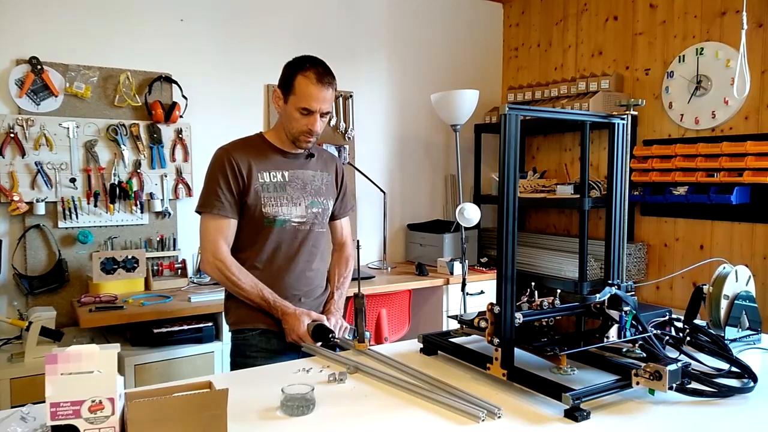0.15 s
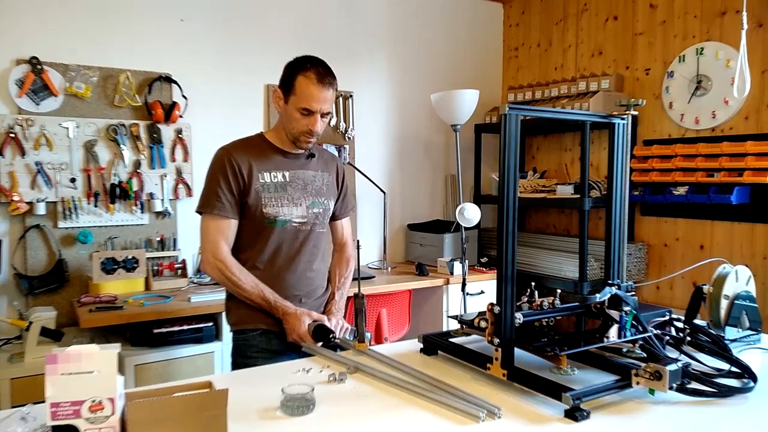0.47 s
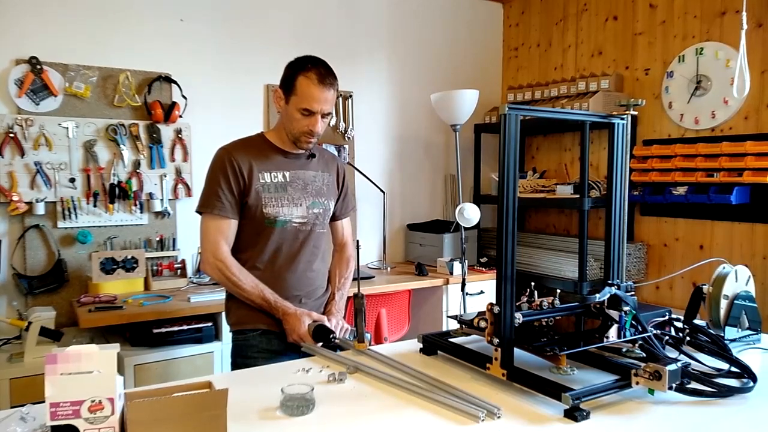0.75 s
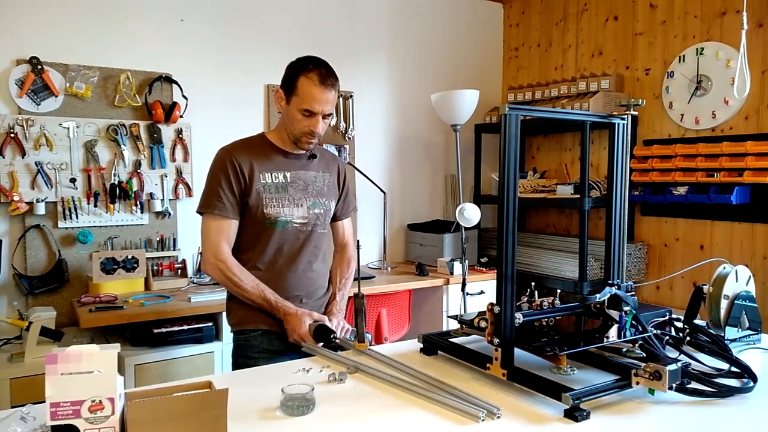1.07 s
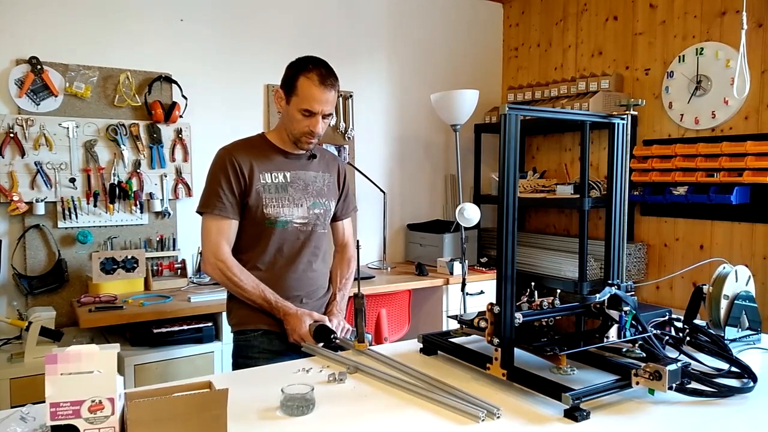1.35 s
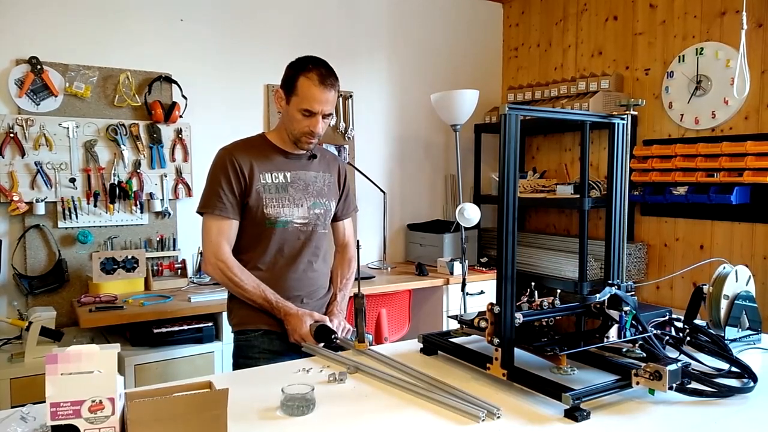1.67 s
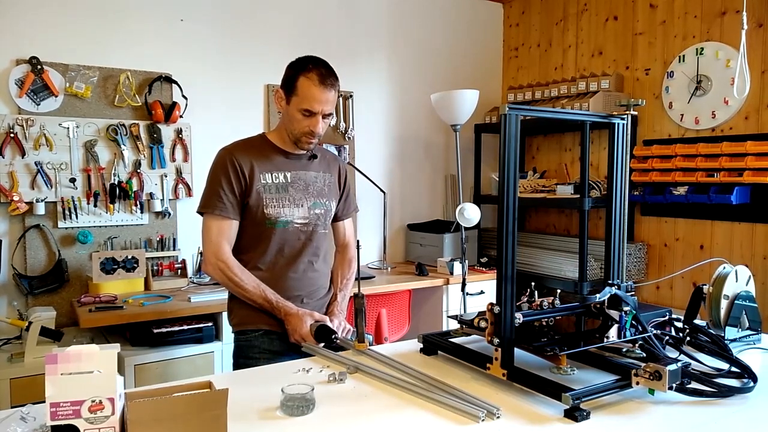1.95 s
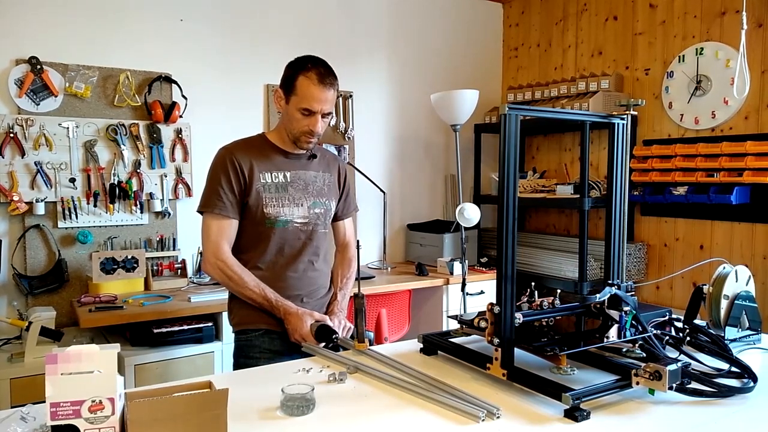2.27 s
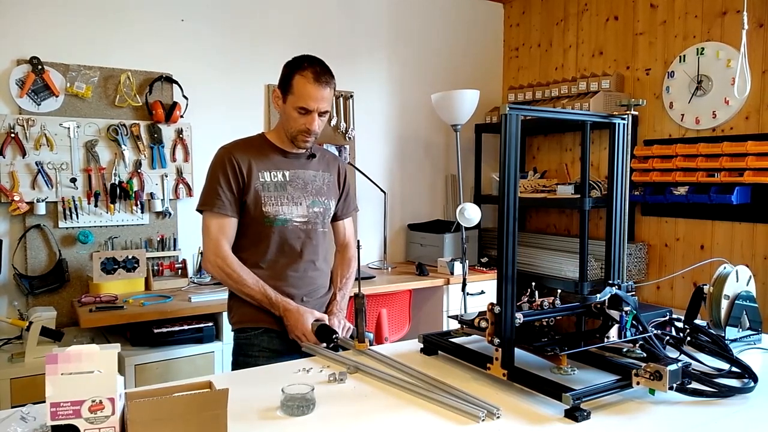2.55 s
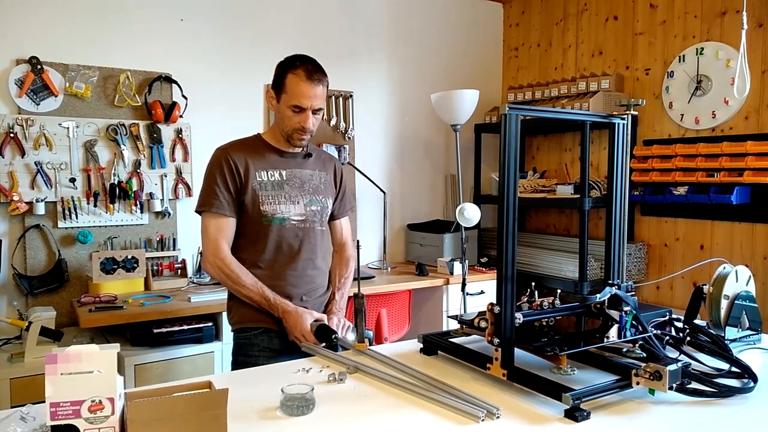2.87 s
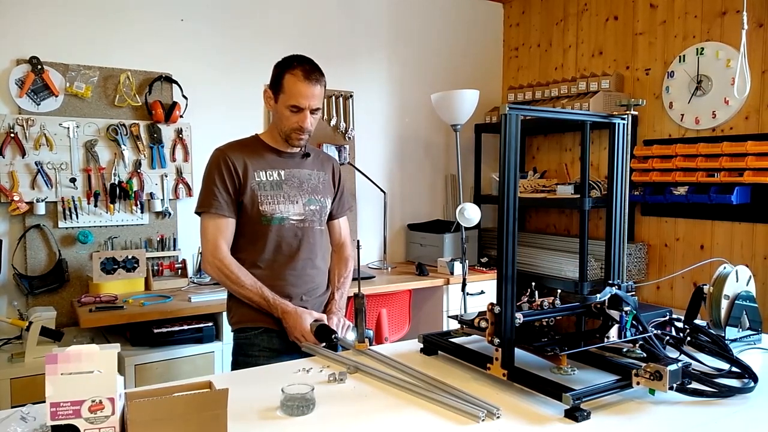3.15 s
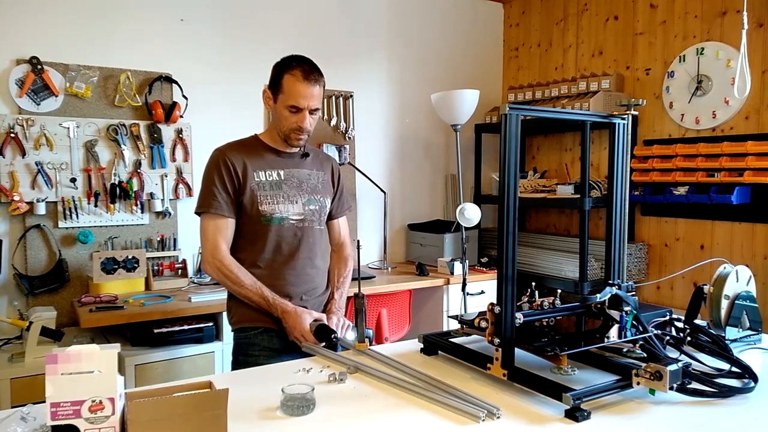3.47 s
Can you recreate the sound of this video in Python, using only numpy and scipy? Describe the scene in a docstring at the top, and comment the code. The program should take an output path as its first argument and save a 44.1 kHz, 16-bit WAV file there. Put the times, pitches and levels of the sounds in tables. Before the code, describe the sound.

Cordless drill driving a tap into aluminium labours and stops; switch snaps, and it backs out faster.

```python
"""Small workshop: a cordless drill drives a tap into an aluminium profile, slowing as the thread bites.
It stops, the direction switch snaps over, and it backs the tap out, first slowly, then at speed.
Gear tones follow the tooth mesh rate; rattle and bright rasp are grain noise pulsed by each tooth.
Under load all three throb with each turn of a gear wheel. The tap squeals and judders, chips ring,
gears clack; a shifting diffuse room and low-heavy noise lie behind."""
import sys
import numpy as np
from scipy import signal
from scipy.fft import rfft, irfft
from scipy.io import wavfile

SR = 44100
rng = np.random.default_rng(int(sys.argv[2]) if len(sys.argv) > 2 else 0)


def store_wav(level_fs):
    """Save 16-bit WAV to argv[1]."""
    pcm = np.round(np.clip(np.atleast_2d(level_fs), -1, 1) * 32767)
    wavfile.write(sys.argv[1], SR, pcm.T.astype(np.int16))


N = 158760
T = np.arange(N) / SR
HZ = np.fft.rfftfreq(N, 1 / SR)
FLUTTER_HZ = 34.85  # bandwidth of level flutter and pitch wander

# low resonances: (frequency [Hz], width [Hz], level over the broad sound [dB])
LOW_MODES = [(223, 19, 8), (268, 7.1, 6.5), (369, 44, 7)]
WHEEL_TEETH, FIRST_THROB_S, RATTLE_THROB_SHARE = 16, 0.0094, 0.44
TOOTH_DEPTH = 0.3
RATTLE_GRIT_DB, RASP_GRIT_DB, GRAINS_PER_S = 2.5, 0.5, 5000


def drill(speed, levels, tones, body, rattle_colour, rasp_colour, throb_db, flutter_db):
    """One run: rough mesh-rate harmonics plus tooth-pulsed rattle and rasp, throbbing per wheel turn."""
    mesh_hz, = at_time(speed)
    tone_db, rattle_db, rasp_db = at_time(levels)
    angle = 2 * np.pi * np.cumsum(mesh_hz) / SR
    first_angle = np.interp(FIRST_THROB_S, T, angle)
    throb = throb_db * np.cos((angle - first_angle) / WHEEL_TEETH)
    teeth = unit(1 + TOOTH_DEPTH * np.cos(angle))

    whine = np.zeros(N)
    for multiple, db, rough, width_hz in tones:
        rough = np.clip(rough, 0, 1)
        waver = np.sqrt(1 - rough) + np.sqrt(rough) * flutter(width_hz)
        gain = np.sqrt(2) * amp(db + at_hz(body, multiple * mesh_hz))
        whine += gain * (waver * np.exp(1j * multiple * angle)).real
    # gear tones throb with the wheel, plus any random level flutter
    whine *= amp(tone_db + throb + flutter_db * flutter(FLUTTER_HZ).real)

    rattle = grains(RATTLE_GRIT_DB) * teeth * amp(rattle_db + RATTLE_THROB_SHARE * throb)
    rattle = colour(rattle, rattle_colour, LOW_MODES)
    rasp = colour(grains(RASP_GRIT_DB) * teeth * amp(rasp_db + throb), rasp_colour)
    running = (T >= levels[0][0]) & (T <= levels[-1][0])
    return running * (whine + rattle + rasp)


# motor speed: (time [s], tooth mesh rate [Hz])
CUT_SPEED = [(0, 511.4), (.2, 471.3), (.45, 428.9), (.7, 397.7), (1.05, 378), (1.42, 360.6), (1.7, 375.6),
             (1.9, 361.2), (2.11, 367.7), (2.27, 119.7)]
# layer gains: (time [s], gear tones [dB], rattle [dB], rasp [dB])
CUT_LEVEL = [(0, -26.5, -28.5, -27.5), (.35, -26, -29.5, -28.5), (.75, -26.5, -27.5, -29),
             (2.106, -33.5, -26.5, -28.5), (2.119, -47, -28, -68), (2.2, -76, -45.5, -84),
             (2.3, -88, -67, -68)]
# gear tones and motor whine: (multiple of mesh rate, relative level [dB], roughness [0-1], width [Hz])
CUT_TONES = [(1, -5.5, 0.74, 46), (2, -9, 0.8, 123), (3, -0.5, 0.79, 167), (6.55, -13, .8, 90)]
# drill radiation of the tones: (frequency [Hz], gain [dB])
CUT_BODY = [(330, -15), (390, -3), (690, 3), (950, -14.5), (1120, 0.5), (1320, -6.5), (2400, -10),
            (2850, -1.5)]
# backlash rattle spectrum: (frequency [Hz], relative density [dB per Hz])
CUT_RATTLE = [(95, -58), (190, -17), (385, -2.5), (470, -7), (640, 2), (820, 0.5), (1400, 0), (3000, -13),
              (5000, -40.5)]
# brush rasp spectrum: (frequency [Hz], relative density [dB per Hz])
CUT_RASP = [(100, -51), (1000, -27.5), (2300, -5.5), (3300, -6), (4000, -0.5), (6700, -0.5), (7700, 2.5),
            (9900, -10), (12600, -14.5), (13400, -38)]


def cutting():
    """Cutting run: the mesh rate sags as the thread loads the motor, with a wheel throb."""
    return drill(CUT_SPEED, CUT_LEVEL, CUT_TONES, CUT_BODY, CUT_RATTLE, CUT_RASP,
                 throb_db=1.5, flutter_db=0)


# motor speed: (time [s], tooth mesh rate [Hz])
BACK_SPEED = [(2.665, 169.3), (2.70, 268.8), (2.78, 265.3), (2.87, 335.1), (2.95, 363.5), (3.025, 346.8),
              (3.055, 484.7), (3.12, 592.6), (3.18, 621.8), (3.6, 665.5)]
# layer gains: (time [s], gear tones [dB], rattle [dB], rasp [dB])
BACK_LEVEL = [(2.659, -86, -53, -52), (2.689, -35.5, -33, -36.5), (2.78, -32.5, -35.5, -37.5),
              (3.02, -29, -36.5, -31.5), (3.07, -30, -33, -29), (3.14, -33.5, -31, -26.5),
              (3.6, -38.5, -31, -26)]
# gear tones and motor whine: (multiple of mesh rate, relative level [dB], roughness [0-1], width [Hz])
BACK_TONES = [(1, 1.5, 0.1, 28), (2, -8, 0.26, 24), (3, -2, 0.69, 136), (6.27, 0, 0.7, 99)]
# drill radiation of the tones: (frequency [Hz], gain [dB])
BACK_BODY = [(230, -12), (290, -17), (370, -20), (480, -9), (640, 1), (1080, -1), (1300, -14), (3400, -19),
             (3850, -1)]
# backlash rattle spectrum: (frequency [Hz], relative density [dB per Hz])
BACK_RATTLE = [(115, -49), (190, -4.5), (380, -9.5), (530, 6), (1500, 2), (2700, -4), (5000, -42)]
# brush rasp spectrum: (frequency [Hz], relative density [dB per Hz])
BACK_RASP = [(100, -70), (1000, -11), (2300, -14.5), (4200, 0), (6700, -0.5), (7900, 5), (10600, -15.5),
             (12400, -15.5), (13400, -25), (16000, -40)]


def backing_out():
    """Reverse run: the mesh rate climbs, with hardly any throb and a slight random level flutter."""
    return drill(BACK_SPEED, BACK_LEVEL, BACK_TONES, BACK_BODY, BACK_RATTLE, BACK_RASP,
                 throb_db=0.1, flutter_db=0.5)


SQUEAL_HZ, SQUEAL_DB, SQUEAL_SPAN_S = (873, 797), -32.5, (0.0185, 0.66)


def tap_squeal():
    """Tap entering the hole: a fluttering squeal that sinks in pitch."""
    swell = np.sin(np.pi * np.interp(T, SQUEAL_SPAN_S, [0, 1]))
    angle = 2 * np.pi * np.cumsum(np.interp(T, SQUEAL_SPAN_S, SQUEAL_HZ)) / SR
    return amp(SQUEAL_DB) * swell * ((1 + flutter(2 * FLUTTER_HZ)) * np.exp(1j * angle)).real


# tap catching in the thread: (time [s], level [dB])
CATCHES = [(0.719, -23.5), (1.005, -17.5), (1.399, -16), (1.67, -16), (1.736, -19.5), (1.927, -19),
           (2.0, -19)]
JUDDER_HZ, JUDDER_WANDER_HZ, JUDDER_RISE_S = 1110, 24.995, 0.0037


def tap_judder():
    """Tap catching in the thread: short bursts of one tone with straying pitch."""
    bursts = np.zeros(N)
    for s, db in CATCHES:
        age = np.maximum(T - s, 0) / JUDDER_RISE_S
        bursts += amp(db) * age * np.exp(1 - age)
    return bursts * wavering(JUDDER_HZ, JUDDER_WANDER_HZ)


# profile resonances: (frequency [Hz], width [Hz], relative level [dB])
PROFILE_MODES = [(4140, 57, 1), (4966, 78, 0.5), (6150, 110, -6), (7300, 70, 0.5)]
CHIPS_DB, CHIPS_PER_S, PROFILE_WANDER_HZ = -42, 120, 95.1


def chips():
    """Chips breaking off ring the profile: random decays on carriers of straying pitch."""
    cut_end_s = CUT_SPEED[-2][0]
    out = np.zeros(N)
    for hz, width_hz, db in PROFILE_MODES:
        breaks = rng.uniform(-1, 1, N) * (rng.random(N) < CHIPS_PER_S / SR) * (T < cut_end_s)
        decay = np.exp(-np.pi * width_hz / SR)
        ring = signal.lfilter([1], [1, -decay], breaks + 1e-18)
        out += amp(CHIPS_DB + db) * unit(ring * wavering(hz, PROFILE_WANDER_HZ))
    return out


# direction switch contacts: (time [s], crack level [dB], ring level [dB])
SWITCH = [(2.4093, -21, -23), (2.412, -18, -40), (2.4132, -21, -11.5)]
# crack spectrum: (frequency [Hz], relative density [dB per Hz])
SWITCH_COLOUR = [(100, -19), (650, 4.5), (2300, -5), (8500, -1), (11500, -21), (16000, -30)]
SWITCH_RING_HZ, SWITCH_RING_S, SWITCH_FADE_S = 7450, .0008, .0015


def switch():
    """Direction switch: three quick plastic contacts as noise cracks; the last rings brightly."""
    crack, ring = np.zeros(N), np.zeros(N)
    for s, crack_db, ring_db in SWITCH:
        crack += amp(crack_db) * dying(s, SWITCH_FADE_S)
        ring += amp(ring_db) * dying(s, SWITCH_RING_S) * np.sin(2 * np.pi * SWITCH_RING_HZ * (T - s))
    return colour(crack * rng.standard_normal(N), SWITCH_COLOUR) + ring


# trigger ticks and gears taking up slack: (time [s], level [dB])
CLACKS = [(2.227, -38), (2.632, -44), (2.646, -39), (2.6793, -16.5), (2.7039, -16.5)]
# clack spectrum: (frequency [Hz], relative density [dB per Hz])
CLACK_COLOUR = [(150, -29), (700, 2), (2000, -5.5), (7500, 2), (16000, -36)]
CLACK_FADE_S = 0.0033


def clacks():
    """Trigger and gearbox: short noise cracks as the drill stops and starts."""
    envelope = sum(amp(db) * dying(s, CLACK_FADE_S) for s, db in CLACKS)
    return colour(envelope * rng.standard_normal(N), CLACK_COLOUR)


HUM_HZ, HUM_DB, HUM_FADE_S = 216, -34, 0.072


def housing():
    """Housing hum: a decaying low tone set off by the last clack."""
    start_s = CLACKS[-1][0]
    return amp(HUM_DB) * dying(start_s, HUM_FADE_S) * np.sin(2 * np.pi * HUM_HZ * (T - start_s))


KNOCK_S, KNOCK_DB, KNOCK_HZ, KNOCK_FADE_S = 2.6685, -29, 846, 0.0048


def rotor_knock():
    """Rotor breaking loose: a dull decaying knock."""
    return amp(KNOCK_DB) * dying(KNOCK_S, KNOCK_FADE_S) * np.sin(2 * np.pi * KNOCK_HZ * (T - KNOCK_S))


PWM_HZ, PWM_SPAN_S, PWM_DB = 3880, (2.651, 2.68), (-48, -51)  # levels: switching rate, octave


def windings():
    """Stalled windings: a brief swell at the switching rate and its octave."""
    swell = np.sin(np.pi * np.interp(T, PWM_SPAN_S, [0, 1]))
    return swell * sum(amp(db) * np.sin(2 * np.pi * (k + 1) * PWM_HZ * T) for k, db in enumerate(PWM_DB))


ROOM_DB, SWAY_HZ = -7, 5


def room(x, count=3):
    """Workshop reverb: echo patterns crossfade as the drill moves; already ringing at the start."""
    x = np.pad(x, (SR, 0), mode="reflect")
    turn = np.pi * SWAY_HZ * np.arange(len(x)) / SR
    wet = sum(signal.fftconvolve(x * np.cos(turn + np.pi * k / count), echoes()) for k in range(count))
    return amp(ROOM_DB) * np.sqrt(2 / count) * wet[SR:SR + N]


# reverberation: (frequency [Hz], 60 dB decay time [s])
ROOM_T60 = [(200, 0.51), (700, 0.36), (6000, 0.42)]
ROOM_GAP_S = 0.0016


def echoes():
    """One diffuse echo pattern: noise decaying at a rate set per frequency, after a short gap."""
    hz, s, z = signal.stft(rng.standard_normal(SR), SR, nperseg=256)
    decay = amp(-60 * s / at_hz(ROOM_T60, hz)[:, None])
    tail = signal.istft(z * decay, SR, nperseg=256)[1][:SR]
    tail = tail * (T[:SR] > ROOM_GAP_S)
    return tail / np.linalg.norm(tail)


# background spectrum: (frequency [Hz], relative density [dB per Hz])
FLOOR = [(25, -27), (200, 18), (9000, 0), (16000, -33)]
FLOOR_DB = -64.5


def background():
    """Steady noise, strongest in the low range."""
    return amp(FLOOR_DB) * colour(rng.standard_normal(N), FLOOR)


def amp(db):
    """Decibels to gain."""
    return 10 ** (np.asarray(db) / 20)


def unit(x):
    """Scales to rms 1."""
    return x / np.sqrt(np.mean(abs(x) ** 2) + 1e-20)


def at_hz(points, hz):
    """Reads a table on a log-frequency axis."""
    f, value = np.transpose(points)
    return np.interp(np.log(hz + 1), np.log(f), value)


def at_time(rows):
    """Every column of a control table, sample by sample."""
    s, *columns = np.transpose(rows)
    return [np.interp(T, s, c) for c in columns]


def colour(x, points, modes=()):
    """Causal minimum-phase filter of unit power: a broad spectrum with resonances on top."""
    power = 1 + sum(amp(db) ** 2 / (1 + (2 * (HZ - f) / width) ** 2) for f, width, db in modes)
    log_gain = np.log(unit(amp(at_hz(points, HZ)) * np.sqrt(power)))
    # fold the cepstrum onto positive time
    cepstrum = irfft(log_gain, N) * np.sign(N / 2 - np.arange(N))
    cepstrum[1:N // 2] *= 2
    cepstrum[N // 2:] = 0
    return irfft(rfft(x) * np.exp(rfft(cepstrum)), N)


def flutter(width_hz):
    """Complex noise that changes about width_hz times a second."""
    z = rng.standard_normal(N) + 1j * rng.standard_normal(N)
    lowpass = 1 + (np.fft.fftfreq(N, 1 / SR) / width_hz) ** 4
    return unit(np.fft.ifft(z / lowpass))


def wavering(hz, wander_hz):
    """A tone whose pitch strays quickly around hz, by wander_hz rms."""
    return np.cos(2 * np.pi * np.cumsum(hz + wander_hz * unit(flutter(FLUTTER_HZ).real)) / SR)


def grains(grit_db):
    """A dense spray of tiny impacts of uneven size."""
    size = amp(grit_db * np.minimum(rng.exponential(1, N), 5))
    return unit(size * rng.choice([-1, 1], N) * (rng.random(N) < GRAINS_PER_S / SR))


def dying(start_s, fade_s):
    """An envelope that jumps up at start_s and dies away."""
    return (T >= start_s) * np.exp(-np.maximum(T - start_s, 0) / fade_s)


def scene():
    """Cut, switch over, back out; the switch cracks, with a smooth diffuse reverb tail behind it."""
    run = cutting() + backing_out()
    work = tap_squeal() + tap_judder() + chips()
    start_stop = clacks() + windings() + rotor_knock() + housing()
    direct = run + work + start_stop
    # separate noise draws smooth the tail
    snap = switch() + sum(room(switch()) for _ in range(3)) / 2
    return (direct + room(direct) + snap + background())[None]


def record(dry):
    """Microphone bass cut and upper band limit."""
    bass_cut = signal.butter(N=2, Wn=130, btype="high", fs=SR, output="sos")
    thin = signal.sosfilt(bass_cut, dry)
    band_limit = signal.firwin(511, 15750, window=("kaiser", 9), fs=SR)
    return signal.oaconvolve(thin, band_limit[None], "same")


dry = scene()
out = record(dry)
store_wav(out)
```